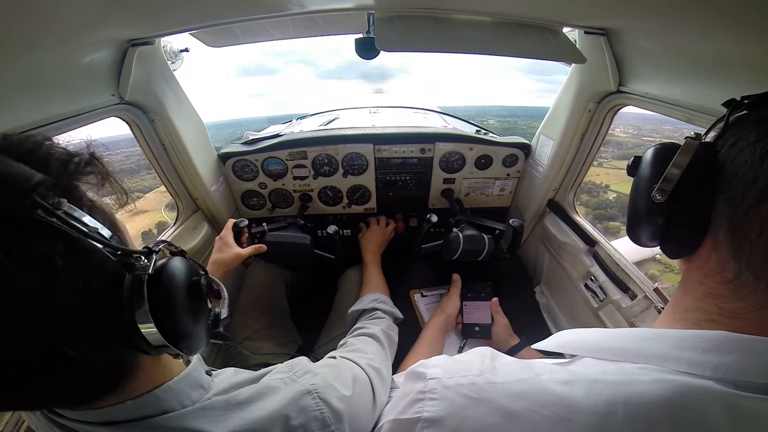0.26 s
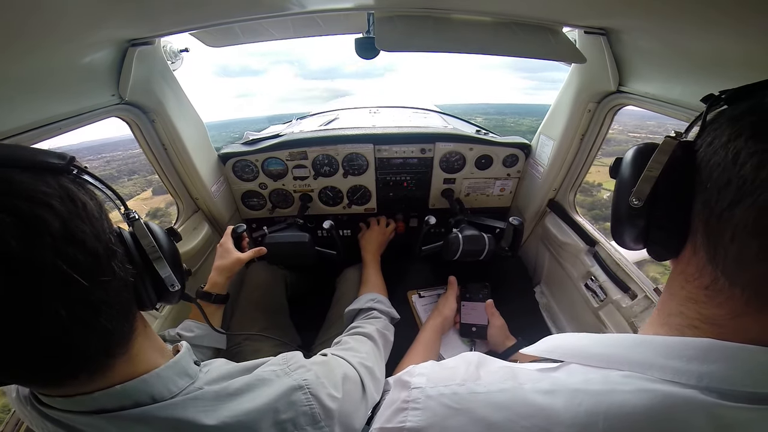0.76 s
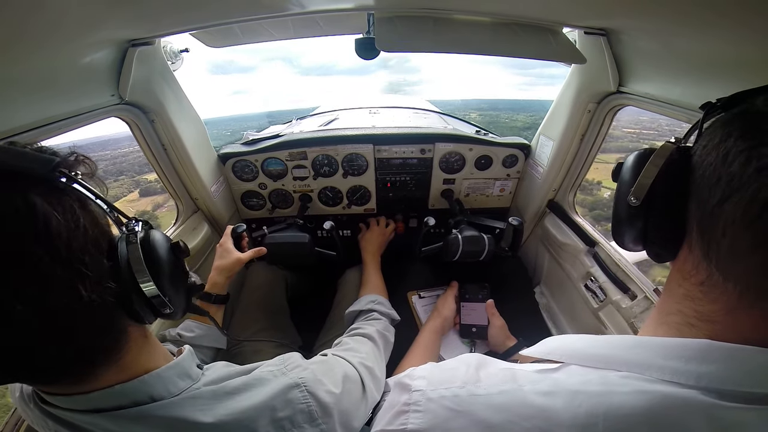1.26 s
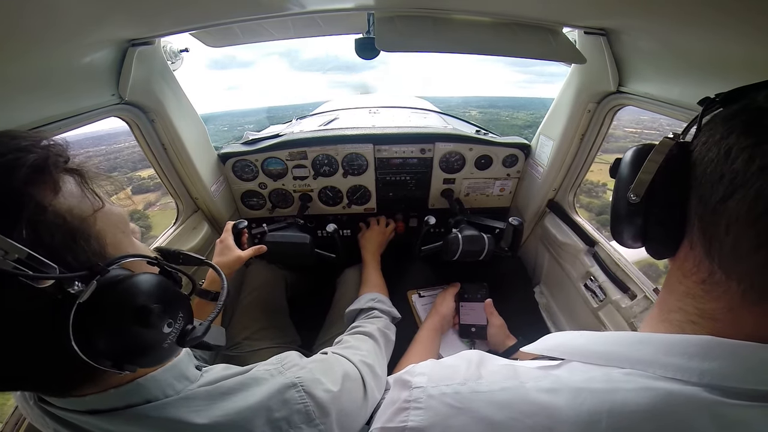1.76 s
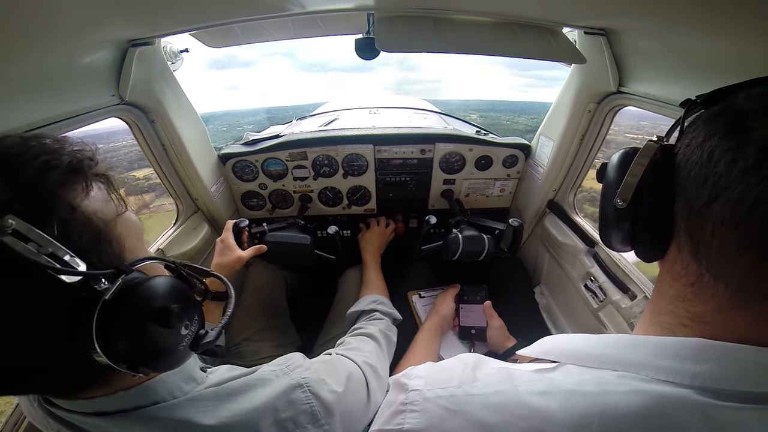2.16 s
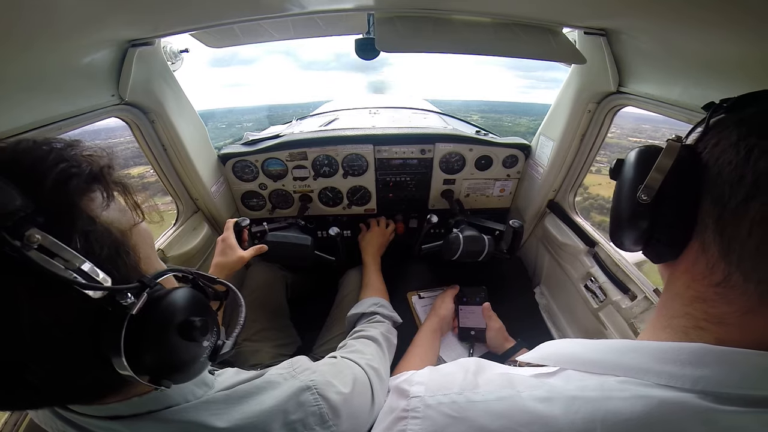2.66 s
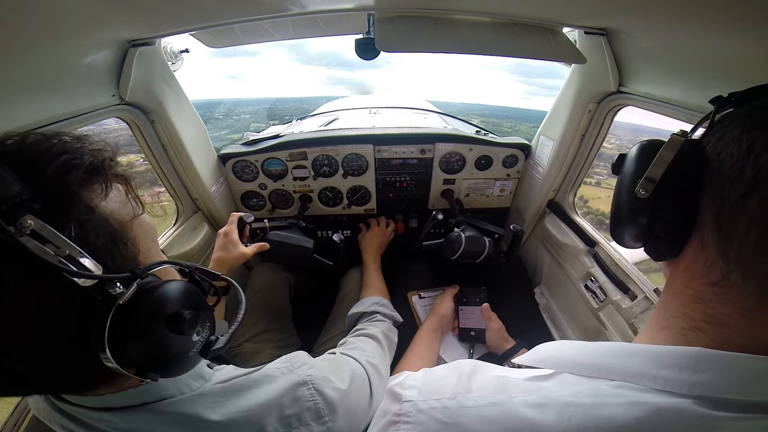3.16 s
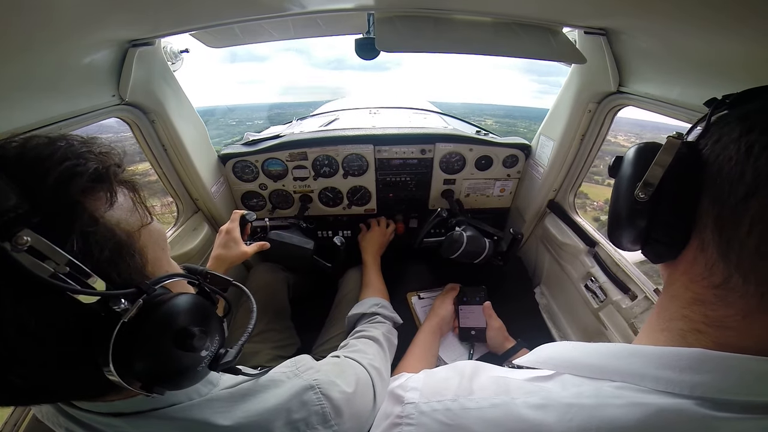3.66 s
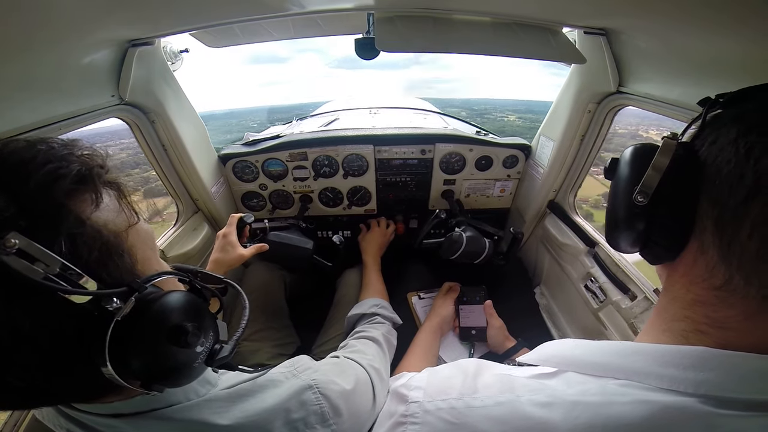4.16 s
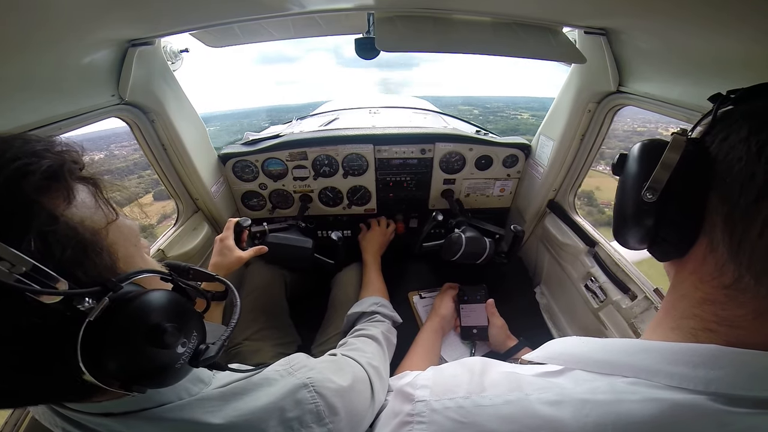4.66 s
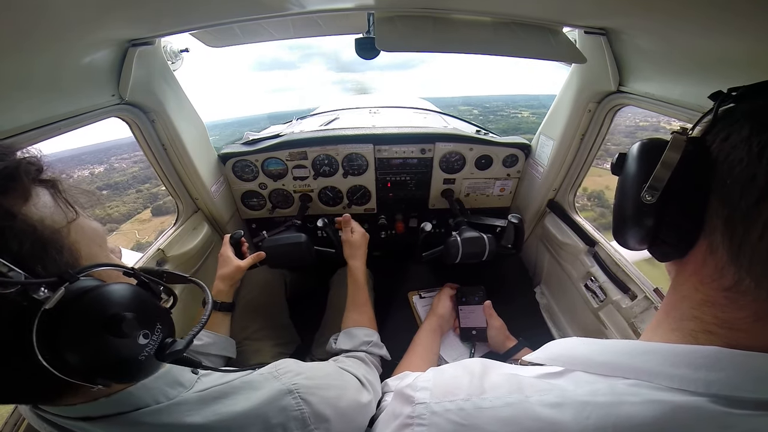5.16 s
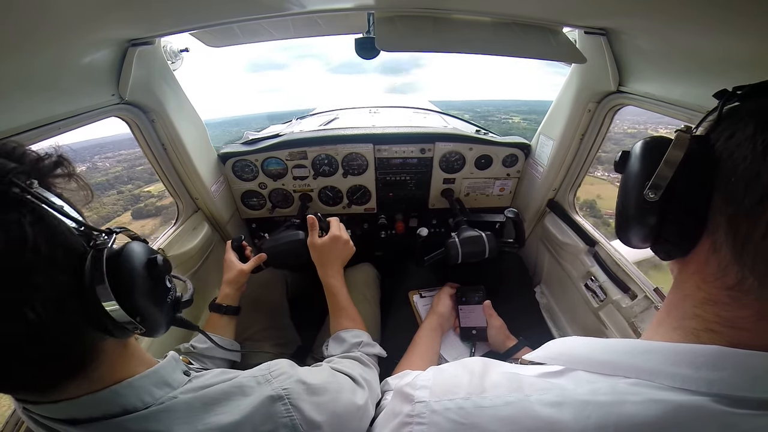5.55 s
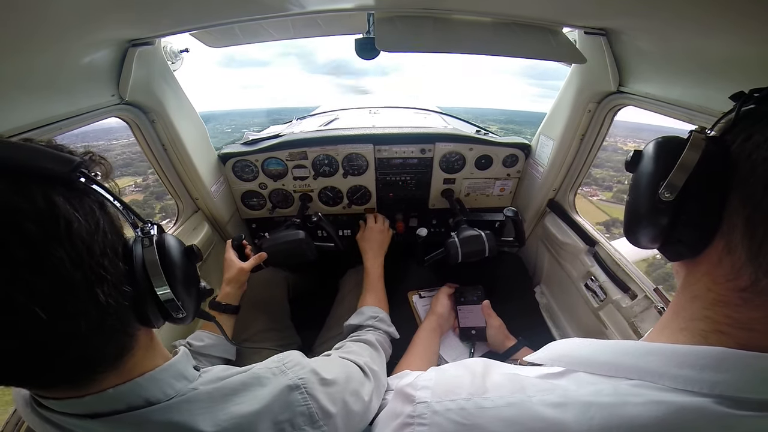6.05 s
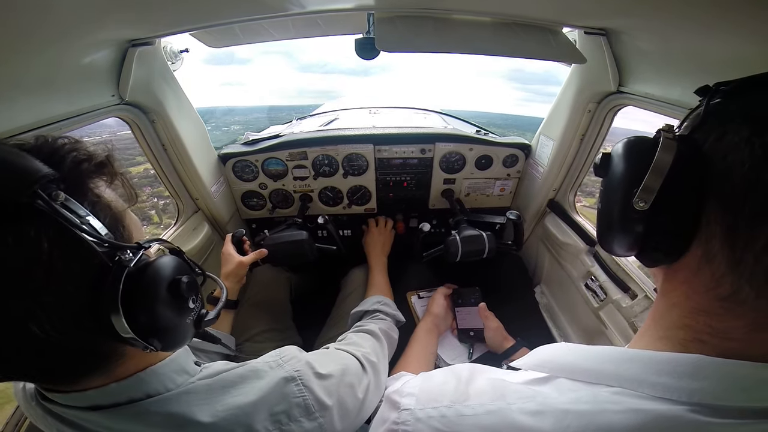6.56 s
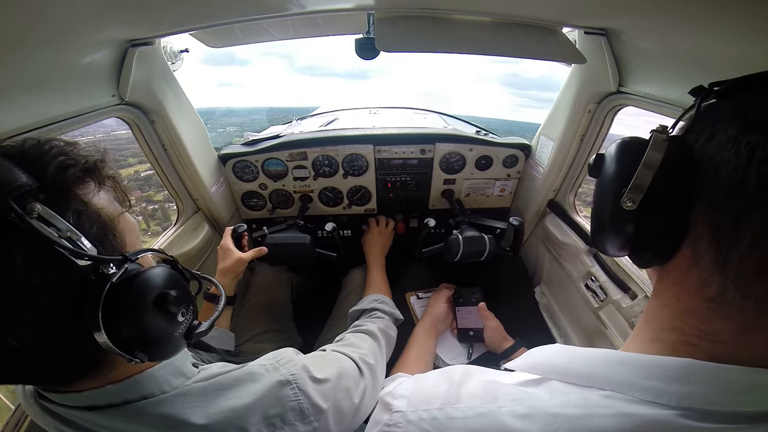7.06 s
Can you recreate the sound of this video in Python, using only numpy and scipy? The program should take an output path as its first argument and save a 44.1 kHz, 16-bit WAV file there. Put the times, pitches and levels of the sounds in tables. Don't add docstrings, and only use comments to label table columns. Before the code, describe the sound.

Steady light-aircraft cabin drone with wavering low boom, rushing air and thin high whistle; tiny clicks midway, a rattling buzz growing at the end.

```python
import sys
import numpy as np
from scipy import signal
from scipy.fft import rfft, irfft, next_fast_len
from scipy.io import wavfile
from scipy.ndimage import uniform_filter1d

SR = 44100
rng = np.random.default_rng(int(sys.argv[2]) if len(sys.argv) > 2 else 0)


def master(y):
    cut = np.clip(np.atleast_2d(y).T, -1, 1)
    pcm = np.round(cut * 32767)
    wavfile.write(sys.argv[1], SR, pcm.astype(np.int16))


def invert_db(x):
    u = np.asarray(x, float) / 20
    return 10 ** u


N = 322371

# time [s], cycle rate [Hz].
CYCLE_RATE = [(0, 19.77), (1.6, 19.83), (3.6, 19.86), (4.9, 19.83), (5.5, 19.79), (6.2, 19.84),
              (7.31, 19.86)]
# time [s], firing tone level [dB].
FIRING_LEVEL = [(0.0, -17.5), (0.12, -23.5), (0.51, -13.5), (0.83, -11), (0.94, -19), (1.1, -12),
                (2.48, -13), (2.69, -10.5), (3.09, -17), (3.26, -11), (4.17, -11.5), (4.72, -21.5),
                (5.01, -15), (5.88, -18), (6.25, -11.5), (6.98, -12), (7.25, -7), (7.31, -7.5)]
# multiple of the cycle rate, level [dB],
# gain per dB the firing tone loses [dB/dB], flutter [dB].
OVERTONES = [(5, -28, -0.2, 3.5), (8, -28, 0.07, 2), (12, -25.5, 0.29, 2.5), (16, -30.5, 0.05, 3)]
# multiple of the cycle rate, level [dB].
WEAK_ORDERS = [(1, -34.5), (2, -38.5), (3, -53), (6, -40), (7, -40), (9, -35), (10, -39.5), (11, -38.5),
               (13, -42), (15, -45), (17, -41.5), (20, -44), (24, -47.5), (28, -50.5), (32, -47.5),
               (36, -46.5), (40, -58), (48, -50.5), (52, -59), (53, -52.5), (56, -55.5)]
# time [s], length
# [s], multiple of the cycle rate (0 is the skin rumble), gain [dB].
SWELLS_AND_DIPS = [(0.203, 0.3, 8, 7.5), (0.516, 0.3, 8, 11), (1.25, 0.32, 8, -6),
                   (2.25, 0.94, 8, 3.5), (3.2, .35, 8, 7), (3.6, 0.14, 8, -9), (4.107, .7, 8, 4),
                   (4.784, 0.33, 8, 10), (4.99, 0.09, 8, -19), (5.332, 0.59, 8, 7),
                   (6.052, 0.32, 8, -9), (6.55, 0.33, 8, 2), (6.944, 0.11, 8, 11.5),
                   (0.296, 0.23, 12, 5), (7.2, 0.3, 0, -5.5), (2.09, 0.43, 12, 5.5), (3.313, 1, 12, 5),
                   (3.98, 0.22, 12, -6), (6.296, 0.11, 12, -9), (6.746, 0.11, 12, 7.5),
                   (7.31, 0.14, 12, -13), (0.214, .3, 16, 5), (3.65, .15, 16, -7),
                   (4.804, 0.22, 16, 1.5), (7.3, 0.28, 16, -14), (3.7, 0.34, 5, 5),
                   (4.64, 0.16, 5, 11), (5.5, .3, 5, 7), (3.72, 0.23, 0, 3), (6.5, 0.46, 0, 1.5),
                   (.77, 0.068, 4, 0), (1.16, .1, 4, 0), (1.46, 0.079, 4, 3.5), (1.543, 0.065, 4, -5.5),
                (1.777, 0.23, 4, -2), (2.018, 0.087, 4, 0.5), (2.917, 0.071, 4, 1.5), (3.44, 0.092, 4, 2),
                (3.624, .08, 4, 1.5), (3.95, 0.1, 4, -2.5), (4.48, .15, 4, -1.5), (4.69, 0.046, 4, 6),
                (4.77, 0.076, 4, -10), (4.86, 0.089, 4, 4), (4.978, 0.055, 4, -3), (5.05, .06, 4, 1.5),
                (5.13, .07, 4, -3), (5.24, .1, 4, 3.5), (5.598, 0.11, 4, -3), (5.71, 0.095, 4, 2),
                (5.99, 0.078, 4, 1.5), (6.31, .05, 4, 0), (6.963, 0.089, 4, -2), (2.69, 0.11, 4, 2),
                (2.82, .1, 4, -1.5), (6.08, 0.09, 4, -3)]
# time [s], peak level [dB], bright snap level [dB].
PANEL_KNOCKS = [
    (3.633, -46, -9),
    (4.148, -45, -9),
    (4.198, -39, 3),
]
# frequency [Hz], level [dB], 60 dB decay time [s].
PANEL_MODES = [(5200, -5, .006), (6800, -6, .005), (8300, -3, .006)]
# time [s], gust level [dB].
GUSTS = [(0, 1), (.42, 2.5), (.65, -2), (1.0, -2), (1.75, 1.2), (2.5, -1), (2.72, 1.1), (2.95, -.9),
         (3.25, 1), (3.95, -1.4), (4.7, 0.76), (5.18, 2), (5.35, -0.6), (5.85, -.5), (6.12, 1.1),
         (6.4, 0.2), (7.31, -0.9)]
# frequency [Hz], density [dB per Hz].
RUMBLE_SPECTRUM = [(20, -18), (45, -13), (65, -8), (76, 16.5), (92, 4), (115, -0.5), (150, 1), (200, -2),
                   (250, 1.5), (305, 0), (335, -5), (350, -11), (395, -13), (420, -44)]
# frequency [Hz], width [Hz], gain
# [dB].
RUMBLE_DIPS = [(79.3, 8, -8), (99.2, 6, -6), (158.6, 8, -8), (238, 8, -8), (317.3, 8, -8)]
# frequency [Hz], density [dB per Hz].
HISS_SPECTRUM = [(220, -23), (380, -4.5), (515, -10.5), (750, -11), (1350, -11), (1880, -10.5), (3000, -14),
                 (4460, -20.5), (6040, -23), (8000, -32.5), (9600, -38), (11800, -42.5), (14000, -50),
                 (15200, -64)]
# frequency [Hz], width [Hz], gain [dB].
CABIN_RESONANCES = [(640, 50, 4), (705, 60, 4), (880, 70, -5), (1045, 50, 5), (1575, 80, 4),
                    (1660, 40, -3.5), (1900, 60, 3), (2030, 200, -10), (2260, 60, -3), (2430, 170, 4),
                    (2800, 150, -2), (3560, 90, -3.5), (4130, 200, -2.5), (4580, 150, 2), (4800, 100, -2),
                    (5100, 300, -4), (5340, 70, -4), (5700, 50, -3), (6060, 40, -4), (6250, 300, 3),
                    (6540, 50, -3), (6635, 50, 3), (6720, 60, -3), (6850, 80, 2), (8350, 400, -2),
                    (9800, 100, -2), (10400, 150, -2), (10750, 80, 2), (11700, 300, 2), (14700, 300, 3)]
# centre time [s], length [s], level [dB].
LOW_VENT_PASSAGES = [
    (5.3, .7, -60),
    (6.7, .8, -57),
]


def engine(turn):
    firing_db = firing_level(2000)
    level_db = firing_db + swell(4) + 0.5 * walk(12)
    out = tone(turn, 4, level_db, 0.11, 7)
    for multiple, mean_db, seesaw, flutter_db in OVERTONES:
        level_db = mean_db - seesaw * (firing_db - np.mean(firing_db)) + swell(multiple)
        level_db = level_db + flutter_db * (1 - walk(13) ** 2)
        out = out + tone(turn, multiple, level_db, 0.17, 5)
    for multiple, mean_db in WEAK_ORDERS:
        sway = min(0.19 + 0.032 * multiple, 1.4)
        out = out + tone(turn, multiple, mean_db + 2.0 * sway * walk(9), 1.01 * sway, 11)
    return np.sqrt(2) * out


def tone(turn, multiple, level_db, phase_sway, sway_rate):
    phase = multiple * turn + phase_sway * walk(sway_rate) + rng.uniform(0, 2 * np.pi)
    return invert_db(level_db) * np.sin(phase)


def panel():
    length = 1024
    out, t = np.zeros(N + length), np.arange(length) / SR
    contact = np.minimum(t / 0.0008, 1) ** 2
    for s, peak_db, snap_db in [*PANEL_KNOCKS, *buzz()]:
        ring = np.zeros(length)
        for hz, db, t60 in [*PANEL_MODES, (12100, snap_db - 5, 0.005)]:
            detune = 1 + 0.03 * rng.standard_normal()
            ring += invert_db(db) * np.sin(2 * np.pi * hz * detune * t) * 1000.0 ** (-t / t60)
        start = int(s * SR)
        out[start:start + length] += invert_db(peak_db + 10.5) * contact * ring
    return out[:N]


def buzz():
    start_s, firing_hz = 7.1095, 79.7
    since = np.arange(0, N / SR - start_s, 1 / firing_hz)
    peak_db = -45 + 32 * since + 2.2 * rng.standard_normal(len(since))
    snap_db = -7 + 4 * rng.standard_normal(len(since))
    return np.transpose([start_s + since, peak_db, snap_db])


def skin_rumble():
    level_db = follow(mean_db=-22.0, per_gust=1.35, seesaw=-0.15, flutter_db=1.37, rate=9) + swell(0)
    return invert_db(level_db) * bands(RUMBLE_SPECTRUM, RUMBLE_DIPS, 0.497, 0.34, 3.24)


def slipstream(turn):
    body_db = follow(mean_db=-29.5, per_gust=1.04, seesaw=0.0444, flutter_db=0.3, rate=6.8)
    leak_db = follow(mean_db=-30.7, per_gust=0.9, seesaw=-0.08, flutter_db=0.15, rate=4.1)
    hiss = bands(HISS_SPECTRUM, CABIN_RESONANCES, 1 / 3, 0.4, 4.6)
    body = signal.sosfiltfilt(signal.butter(2, 4500, fs=SR, output="sos"), hiss)
    buffet = walk(40)
    quick = buffet - uniform_filter1d(buffet, SR // 11)
    leak = (hiss - body) * invert_db(1.1 * quick)
    pulse = 1 + 0.03 * (np.cos(2 * turn) + np.cos(4 * turn) + np.cos(8 * turn))
    return pulse * (invert_db(body_db) * body + invert_db(leak_db) * leak)


def vents(turn):
    level_db = follow(mean_db=-49.5, per_gust=0.8, seesaw=0.5, flutter_db=1.5, rate=7)
    whistle = narrow_noise(5820, 6010) * (1 + 0.17 * np.cos(4 * turn)) * invert_db(0.98 * walk(6.7))
    t, low_gain = np.arange(N) / SR, np.zeros(N)
    for s, length, db in LOW_VENT_PASSAGES:
        low_gain += invert_db(db) * np.exp(-(2 * (t - s) / length) ** 4)
    return invert_db(level_db) * whistle + low_gain * narrow_noise(5430, 5540)


def narrow_noise(low_hz, high_hz):
    band = signal.butter(2, [low_hz, high_hz], "bandpass", fs=SR, output="sos")
    return unit(signal.sosfilt(band, rng.standard_normal(N)))


def bands(points, peaks, step, flicker_db, flicker_rate):
    size = next_fast_len(N)
    hz = np.arange(1, size // 2 + 2) * SR / size
    point_hz, point_db = np.transpose(points)
    db = np.interp(np.log(hz), np.log(point_hz), point_db, left=-90)
    db = db - 40 * np.maximum(np.log2(hz / point_hz[-1]), 0)
    for centre_hz, width_hz, peak_db in peaks:
        db = db + peak_db / (1 + (2 * (hz - centre_hz) / width_hz) ** 2)
    colour = rfft(rng.standard_normal(size)) * invert_db(db)
    lowest, highest = np.log2(point_hz[0]), np.log2(point_hz[-1])
    out = 0
    for octave in np.arange(lowest - step, highest + 1.5 * step, step):
        share = np.clip(1 - np.abs(np.log2(hz) - octave) / step, 0, 1)
        out = out + irfft(colour * share, size)[:N] * invert_db(flicker_db * walk(flicker_rate))
    return unit(out)


def follow(mean_db, per_gust, seesaw, flutter_db, rate):
    firing_db = firing_level(SR // 3)
    gust_db = per_gust * curve(GUSTS)
    return mean_db + gust_db - seesaw * (firing_db - np.mean(firing_db)) + flutter_db * walk(rate)


def firing_level(smoothing):
    return uniform_filter1d(curve(FIRING_LEVEL), smoothing)


def swell(multiple):
    t = np.arange(0, N / SR + 0.01, 0.005)
    gain_db = np.zeros(len(t))
    for s, length, which, db in SWELLS_AND_DIPS:
        if which == multiple:
            gain_db += db * np.exp(-(2 * (t - s) / length) ** 2)
    return np.interp(np.arange(N) / SR, t, gain_db)


def walk(rate):
    steps = int(N * rate / SR) + 2
    coarse = np.repeat(rng.standard_normal(steps), 16)
    coarse = uniform_filter1d(uniform_filter1d(coarse, 16), 16)
    place = np.arange(N, dtype=np.float32) * (rate * 16 / SR)
    return unit(np.interp(place, np.arange(len(coarse)), coarse))


def curve(table):
    s, value = np.transpose(table)
    return np.interp(np.arange(N) / SR, s, value)


def unit(x):
    return x / np.sqrt(np.mean(np.abs(x) ** 2))


def scene():
    turn = 2 * np.pi * np.cumsum(curve(CYCLE_RATE)) / SR
    return (engine(turn) + panel() + skin_rumble() + slipstream(turn) + vents(turn))[None]


def low_pass(x):
    return signal.sosfilt(signal.butter(12, 15150, fs=SR, output="sos"), x)


def record(dry):
    rounded = np.tanh(0.85 * dry) / 0.8
    return low_pass(rounded)


dry = scene()
out = record(dry)
master(out)
```